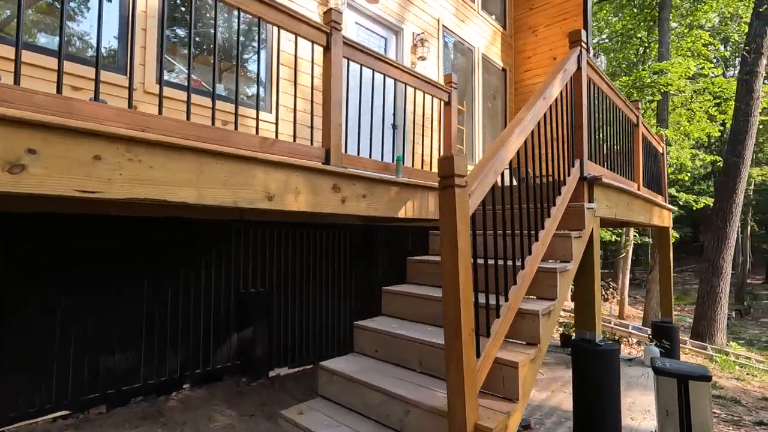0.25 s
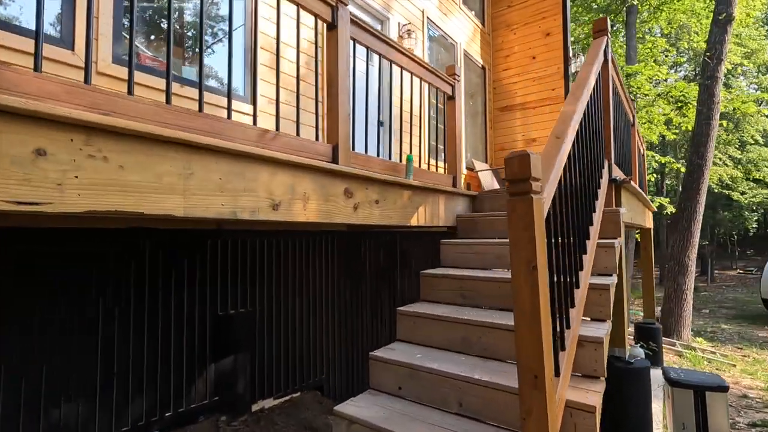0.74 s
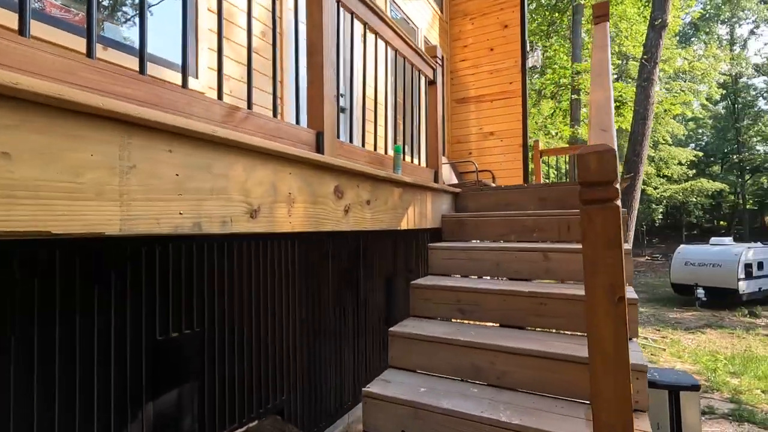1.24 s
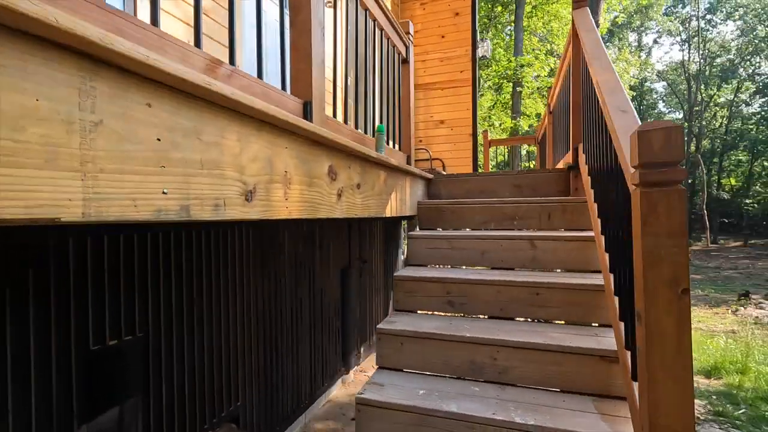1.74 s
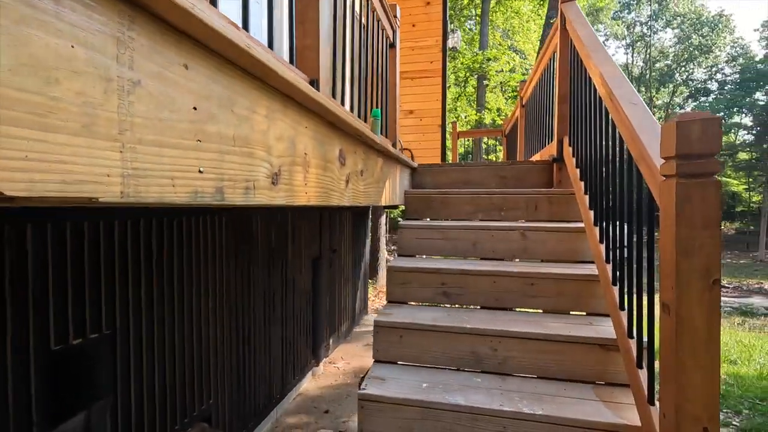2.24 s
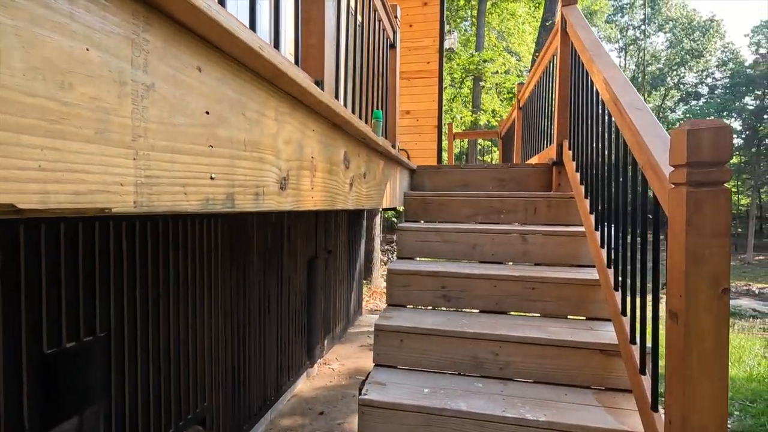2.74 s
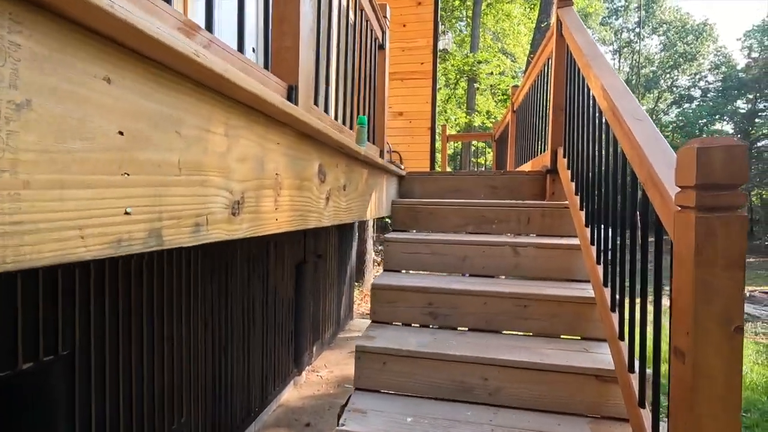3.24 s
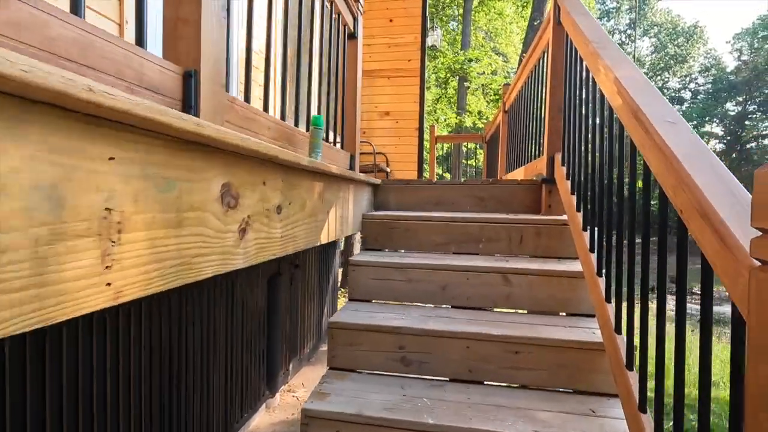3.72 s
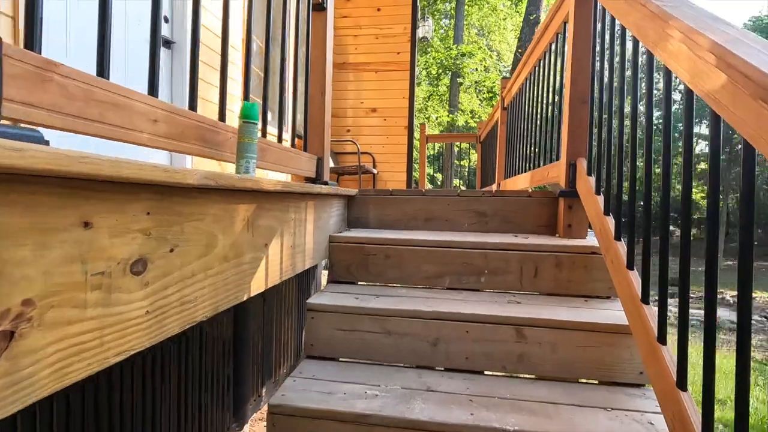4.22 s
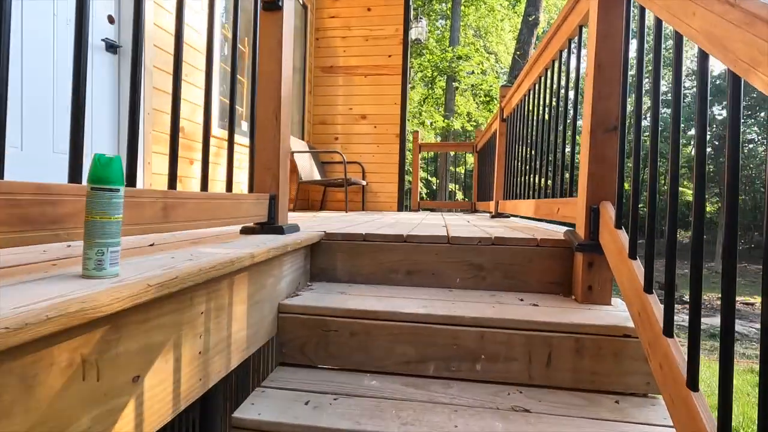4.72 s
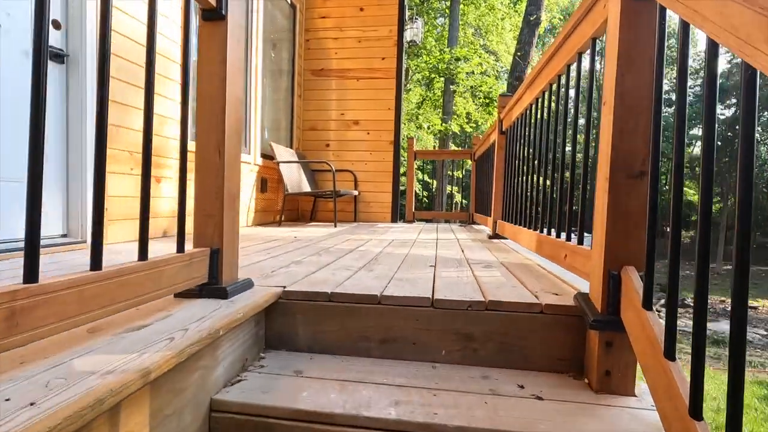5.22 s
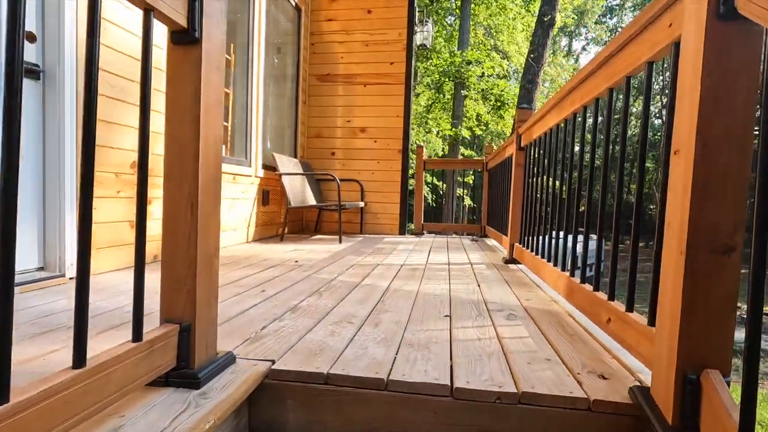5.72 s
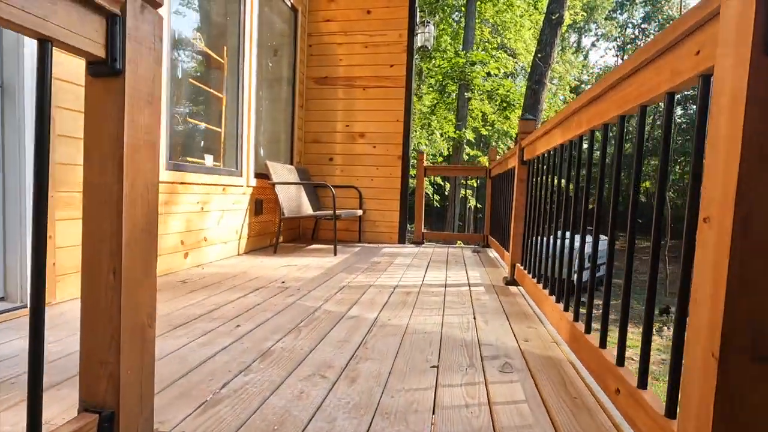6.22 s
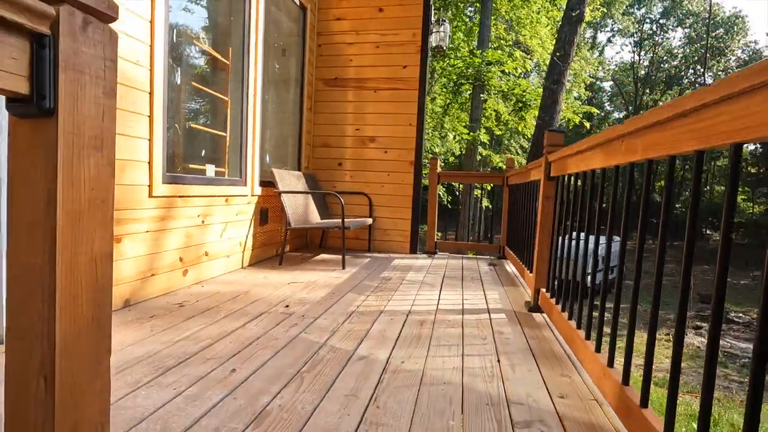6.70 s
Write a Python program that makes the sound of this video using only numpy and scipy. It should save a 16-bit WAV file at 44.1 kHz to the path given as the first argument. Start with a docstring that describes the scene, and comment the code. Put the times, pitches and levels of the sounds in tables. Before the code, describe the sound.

Outdoors beside a wooden house among trees, a walker carrying the microphone scuffs softly over packed earth. A nearby wren repeats a quick three-note gliding whistle during the first second or so, echoing off wall and trunks. Keys jingle briefly, a few soil steps follow, then shoes knock up hollow wooden stairs in spaced, low-ringing thuds. Clothes rustle, leaves hiss faintly, and handling rumble grows.

```python
"""Someone carrying a camera walks over packed earth, keys jingling, and climbs wooden deck stairs.
Each contact scuffs: noise for rub and grit; earth adds a dull push, treads add ringing board and stair-frame modes.
Shaken keys are noise through metal resonances. A wren repeats three gliding whistles, echoed by house and trees.
Faint far birds are narrow noise bands; shaped noise makes the dull wash around the steps, cloth rustle, dry ticks,
far leaves, drone and low rumble at the microphone."""
import sys
import numpy as np
from scipy import signal
from scipy.fft import rfft, irfft, next_fast_len
from scipy.io import wavfile
from scipy.ndimage import uniform_filter1d

SR = 44100
rng = np.random.default_rng(int(sys.argv[2]) if len(sys.argv) > 2 else 0)


def log_audio(samples):
    """Write samples as a 16-bit WAV file to the path given in sys.argv[1]."""
    # one column per channel
    frames = np.atleast_2d(samples).T
    # limit to full scale, then quantise
    limited = np.clip(frames, -1, 1)
    pcm = np.round(limited * 32767).astype(np.int16)
    wavfile.write(sys.argv[1], SR, pcm)


N = 306936
LEFT_RIGHT = np.array([[1], [-1]])  # sign of a level difference at each port


def amp(db):
    """Gain of a level in dB."""
    return 10 ** (np.asarray(db) / 20)


def unit(x):
    """Scaled to rms 1."""
    return x / np.sqrt(np.mean(x ** 2) + 1e-20)


def along(points, hz):
    """Value at each frequency, interpolated between (Hz, value) points on a log axis."""
    point_hz, value = np.transpose(points)
    return np.interp(np.log(hz + 1), np.log(point_hz + 1), value)


def curves(rows):
    """One value per sample for each column after the time."""
    s, *columns = np.transpose(rows)
    return [np.interp(np.arange(N) / SR, s, column) for column in columns]


def wobble(rate, size=N):
    """A random curve of straight lines between normal knots, rate knots a second."""
    knots = rng.standard_normal(int(size * rate / SR) + 2)
    return np.interp(np.arange(size) * rate / SR, np.arange(len(knots)), knots)


def swells(times, peaks_db, slopes, rest_db, held=0):
    """Level in dB that climbs to each peak, holds and falls away at fixed rates, down to a resting level."""
    after = np.arange(N) / SR - np.asarray(times)[:, None]
    climb_db = -slopes[0] * after
    fall_db = slopes[1] * (after - np.reshape(held, (-1, 1)))
    drop_db = np.maximum(np.maximum(climb_db, fall_db), 0)
    return np.maximum((np.asarray(peaks_db)[:, None] - drop_db).max(0), rest_db)


def filtered(x, response):
    """x shaped by a complex response of frequency."""
    size = next_fast_len(x.shape[-1] + 4096, True)
    spectrum = rfft(x, size) * response(np.fft.rfftfreq(size, 1 / SR))
    return irfft(spectrum, size)[..., :x.shape[-1]]


def noise(spectrum, crackle_db, size=N):
    """Coloured noise of rms 1; crackle spreads the grain sizes."""
    grain_db = crackle_db * np.minimum(rng.exponential(size=size), 6)
    grains = rng.standard_normal(size) * amp(grain_db)
    return unit(filtered(grains, lambda hz: amp(along(spectrum, hz))))


def rush(spectrum, alike, patchy_db):
    """Stereo noise of rms 1 with patches of random gain in time and frequency."""
    z = signal.stft(rng.standard_normal((2, N)), nperseg=512)[2]
    field = uniform_filter1d(rng.standard_normal(z.shape[1:]), 6, 0)
    field = uniform_filter1d(field, 14, 1)
    pair = signal.istft(z * amp(patchy_db * unit(field)), nperseg=512)[1][:, :N]

    def mid_side_gain(hz):
        angle = np.arccos(along(alike, hz)) / 2  # the likeness sets how much side joins the mid
        return amp(along(spectrum, hz)) * [np.cos(angle), np.sin(angle)]

    mid, side = filtered(pair, mid_side_gain)
    return unit(np.array([mid + side, mid - side]))


def add(out, s, x, pan_db=0):
    """Mixes x in at time s; pan_db is left above right."""
    seat = out[:, round(s * SR):][:, :x.shape[-1]]
    panned = np.atleast_2d(x) * amp(LEFT_RIGHT * pan_db / 2)
    seat += panned[:, :seat.shape[1]]


def ring(modes, t, attack, spread_db):
    """Damped modes at fresh strengths and slightly shifted pitches for one blow."""
    hz, db, t60 = np.transpose(modes)[:, :, None]
    level_luck, pitch_luck = rng.standard_normal((2, len(modes), 1))
    decay = amp(db + spread_db * level_luck - 60 * t / t60)
    tones = decay * np.sin(2 * np.pi * hz * (1 + 0.034 * pitch_luck) * t)
    return tones.sum(0) * (1 - np.exp(-t / attack))


# spread of an echo at the microphone: pitch_hz, side_below_mid_db
ECHO_WIDTH = [(60, -61), (250, -20), (600, -6), (4000, -8), (12000, 0)]


def echo(x, decay, size):
    """A stereo tail, mid energy 1, each frequency dying at its own speed; the ports share the bass."""
    hz, t, z = signal.stft(rng.standard_normal((2, size)), SR, nperseg=256)
    z = z * amp(-60 * t / along(decay, hz)[:, None])
    z[1] *= amp(along(ECHO_WIDTH, hz))[:, None]
    mid, side = signal.istft(z, SR, nperseg=256)[1]
    tail = np.array([mid + side, mid - side]) / np.linalg.norm(mid)
    return signal.fftconvolve(x[None], tail, axes=1)


# dull rub of a sole close to the ground: multiple_of_centre, level_db
RUB_COLOUR = [(.15, -11.5), (.5, -3.5), (1, 1), (1.6, -5.5), (2.5, -18), (5, -29.5), (12, -61)]
# fine grit under the sole: pitch_hz, level_db
GRIT_COLOUR = [(1200, -29), (2500, 0.5), (4000, -2), (6000, -7), (8500, -19), (12500, -30), (16000, -46)]


def scuff(db, centre_hz, grit_db, rise, slide, t60, t):
    """The sole skids, then stops: a dull rub plus finer grit that dies sooner."""
    swell = 1 - np.exp(-t / rise)
    fade = np.maximum(t - slide, 0) / t60
    rub_colour = [(centre_hz * multiple, level) for multiple, level in RUB_COLOUR]
    rub = noise(rub_colour, crackle_db=1.5, size=len(t)) * amp(db - 60 * fade)
    grit = noise(GRIT_COLOUR, crackle_db=0.0, size=len(t)) * amp(db + grit_db - 133 * fade)
    return (rub + grit) * swell


# swells as the walker moves through a stride: peak_s, wash_db (dull wash), rustle_db (clothes), jolt_db (camera)
WALK_STRIDES = [(.05, -59.5, -85, -45.5), (.37, -54.5, -61, -52), (.62, -62.5, -75, -49),
                (1.06, -56, -64.5, -37), (1.47, -65, -70, -44), (1.84, -60, -65.5, -38),
                (2.19, -57.5, -60, -49), (2.83, -80, -63, -55), (3.35, -66.5, -62.5, -47),
                (3.59, -60.5, -57.5, -38), (4.3, -58, -58.5, -33), (4.91, -62, -67, -26),
                (5.5, -62, -73, -31.5), (6.1, -59.5, -63.5, -26.5), (6.7, -60, -60, -29.5),
                (6.93, -61, -62, -37)]
# dull wash around the steps: pitch_hz, level_db (per Hz)
WASH_COLOUR = [(150, -9), (250, -8), (358, -7.5), (401, -5.5), (889, -9), (1100, -0.5), (2400, -9.5),
               (3120, -32), (5280, -120)]
# clothes close to the microphone: pitch_hz, level_db
CLOTH_COLOUR = [(2000, 1.5), (5000, 3.5), (8000, -4), (11000, -12.5), (12500, -6), (14000, -7), (16000, -5)]
WASH_DB_PER_S, RUSTLE_DB_PER_S = (80, 59), (46, 44)  # swell before the peak, fading after
WASH_REST_DB, RUSTLE_REST_DB = -82, -73.5


def strides():
    """A dull wash and the rustle of clothes: noise that swells to a peak and fades with each stride."""
    s, wash_db, rustle_db, _ = np.transpose(WALK_STRIDES)
    wash_level = swells(s, wash_db, WASH_DB_PER_S, WASH_REST_DB) + 3.5 * wobble(25)
    wash = amp(wash_level) * noise(WASH_COLOUR, crackle_db=0.0)
    cloth = np.array([noise(CLOTH_COLOUR, crackle_db=4.0), noise(CLOTH_COLOUR, crackle_db=-2.0)])
    rustle_level = swells(s, rustle_db, RUSTLE_DB_PER_S, RUSTLE_REST_DB) + 1.6 * wobble(38)
    rustle = amp(rustle_level) * cloth
    return wash * amp(LEFT_RIGHT * 1.2) + rustle * amp(LEFT_RIGHT * 3.5)


# slowly changing low sound at the microphone: time_s, rumble_db, drone_db, rumble_left_right_db
LOW_LEVELS = [(0, -51.5, -66.5, -3.5), (1.1, -50.5, -60.5, -3.5), (1.7, -47, -64.5, -3),
              (2.1, -49.5, -60.5, -3.5), (2.6, -58.5, -63, -4), (3.2, -44.5, -60.5, -5),
              (3.9, -45.5, -60.5, -7.5), (4.3, -42.5, -53, -4), (4.6, -44.5, -60.5, -6.5),
              (5.2, -38, -58, 2.5), (5.7, -37, -55.5, 2), (5.95, -41.5, -63.5, -4.5), (6.35, -41, -56, 4.5),
              (6.6, -40, -61.5, -2), (6.96, -33, -49, -1.1)]
# far leaves: pitch_hz, level_db (per Hz)
LEAF_COLOUR = [(240, -14), (400, -1.5), (466, -10.5), (544, -9), (862, -11.5), (1230, 1), (1800, -3),
               (3430, 1), (4260, -4.5), (5120, -3), (6540, -2), (8240, -8), (11400, -12), (12500, -12.5),
               (15700, -18.5)]
# likeness of the leaves at the two ports: pitch_hz, left_right_likeness (0 to 1)
LEAF_LIKENESS = [(60, 0.6), (180, 0.49), (550, 0.58), (1650, 0.27), (4970, 0.82), (15000, 0.38)]
# left-right lean of the leaves: pitch_hz, left_right_db
LEAF_LEAN = [(60, 5), (180, -13), (550, -14), (1650, 2), (4970, -1.5), (15000, 1.5)]
# low drone: pitch_hz, level_db (per Hz)
DRONE_COLOUR = [(24, -19), (40, -2), (64, -15.5), (129, -12.5), (248, -17), (395, -34), (427, -34.5),
                (600, -41.5), (780, -59), (1320, -120)]
# rumble of the moving camera: pitch_hz, level_db
RUMBLE_COLOUR = [(5, -13), (12, 7), (22, 0.5), (40, -12), (60, -16.5), (120, -91)]
LEAVES_DB = -62.5
JOLT_DB_PER_S, DRONE_OVER_JOLT_DB = (127, 114), -16.5  # swell and fading; drone jolt relative to rumble jolt


def woodland():
    """Far leaves hiss, a low drone hums and the moving camera rumbles; each stride jolts both low sounds."""
    rumble_db, drone_db, pan_db = curves(LOW_LEVELS)
    s, *_, peak_db = np.transpose(WALK_STRIDES)
    jolt_db = swells(s, peak_db, JOLT_DB_PER_S, rest_db=-120)
    leaves = amp(LEAVES_DB + 1.2 * wobble(0.8)) * rush(LEAF_COLOUR, LEAF_LIKENESS, patchy_db=1.95)
    leaves = filtered(leaves, lambda hz: amp(along(LEAF_LEAN, hz) / 2 * LEFT_RIGHT))
    drone_mid = noise(DRONE_COLOUR, crackle_db=0)
    drone_side = amp(-11.0) * LEFT_RIGHT * noise(DRONE_COLOUR, crackle_db=-1.5)
    rumble = noise(RUMBLE_COLOUR, crackle_db=-2.0) * amp(LEFT_RIGHT * pan_db / 2)
    # the louder of slow curve and jolt sets the level
    drone_level = np.maximum(drone_db, jolt_db + DRONE_OVER_JOLT_DB) + 3.9 * wobble(7.1)
    rumble_level = np.maximum(rumble_db, jolt_db) + 3.1 * wobble(9)
    return leaves + amp(drone_level) * (drone_mid + drone_side) + amp(rumble_level) * rumble


NOTE_EDGE_S = 0.0024  # soft ends of a note


def note(before, after, bend, start_hz, turn_hz, end_hz, start_db, turn_db, end_db):
    """A husky whistle glides to a rounded turn and away again; loudness bends with the pitch."""
    t = np.arange(-before, after, 1 / SR)
    way = np.where(t < 0, -t / before, t / after) ** bend  # 0 at the turn, 1 at either end
    glide_hz = turn_hz + (np.where(t < 0, start_hz, end_hz) - turn_hz) * way
    level_db = turn_db + (np.where(t < 0, start_db, end_db) - turn_db) * way
    level_db = level_db + 1.4 * wobble(150.0, size=len(t))
    pitch_hz = glide_hz * (rng.normal(1, 0.0076) + 0.016 * wobble(249.0, size=len(t)))
    edges = np.clip(np.minimum(t + before, after - t) / NOTE_EDGE_S, 0, 1)
    return edges * amp(level_db) * np.sin(2 * np.pi * np.cumsum(pitch_hz) / SR)


# the wren's phrases among the trees: start_s, level_db
WREN_SONG = [(-.137, -45.5), (.147, -44), (.447, -43), (0.746, -42.5), (1.057, -43.5)]
# notes of a phrase: start_s (into the phrase), before_turn_s, after_turn_s, bend (power of time),
# start_hz, turn_hz, end_hz, start_db, turn_db, end_db (above the phrase level)
WREN_PHRASE = [(-.009, 0.01985, .038, 2.4, 2206, 3138, 1980, -18, -0.4, -12.5),
               (.069, .03, .031, 1.85, 4900, 3604, 4440, -9, -5, -7.5),
               (.13, .021, .052, 1.2, 4430, 2840, 3527, -0.5, -2.5, -8.5)]
# echo off near trunks and the house: pitch_hz, t60_s
NEAR_ECHO = [(2000, 0.033), (5000, 0.18)]
# echo among trees: pitch_hz, t60_s
WOODS_ECHO = [(2000, 0.26), (5000, 1)]


def wren():
    """Three notes a phrase; the house wall repeats them, near and far echoes smear them."""
    lead = SR // 2  # room for a phrase that begins before time 0
    out = np.zeros((2, N + SR))
    for s, level_db in WREN_SONG:
        for start, *shape in WREN_PHRASE:
            call = amp(level_db) * note(*shape)
            at = s + start + lead / SR
            add(out, at, call, pan_db=1.0)
            add(out, at + 0.016, call * amp(-3), pan_db=6.0)  # house wall
            add(out, at + 0.002, amp(2.5) * echo(call, NEAR_ECHO, size=SR // 8))
            add(out, at + 0.023, amp(-1) * echo(call, WOODS_ECHO, size=SR * 2 // 5))
    return out[:, lead:lead + N]


# shoe on earth and stones, and one faint scrape as the keys shake (2.729):
# start_s, scuff_db, scuff_hz, grit_db (above the scuff), thud_db, rise_s, slide_s
EARTH_STEPS = [(.206, -50.5, 1200, 3.5, -66, .0017, .002), (.259, -53, 1100, 8, -56, 0.0022, 0.0044),
               (.3, -50.5, 980, 0, -67, .0039, 0.017), (.385, -49, 854, -8, -48, .0064, 0.037),
               (.674, -51, 1120, -21, -53.5, 0.00067, .002), (.883, -57, 994, -1, -56, .0019, 0.02),
               (.992, -51, 1014, -5, -41.5, 0.0028, .023), (1.131, -48.5, 1295, -18, -56, 0.00081, .0033),
               (1.706, -45.5, 900, -12, -48, 0.00052, 0.037),
               (1.737, -41.5, 870, -13, -37.5, 0.0038, 0.016), (1.803, -47, 720, -28, -55, .0008, .005),
               (1.892, -49, 1250, -10, -69, 0.00092, .002), (1.904, -51.5, 2000, 0.5, -48, .001, .002),
               (1.929, -41, 1200, -27, -50.5, .0006, .0008), (2.092, -43.5, 1220, -26, -68, 0.00054, .0009),
               (2.11, -58.5, 1700, -10, -65, .011, 0.045), (2.213, -48, 1110, -6, -53.5, 0.0044, 0.0053),
               (2.729, -62, 1500, 5, -76, .005, 0.034), (3.335, -62, 1010, -12, -80, .001, 0.017),
               (3.396, -51.5, 1380, -8, -80, 0.0019, 0.014), (3.492, -47, 1160, -15, -37.5, .0006, 0.028),
               (3.599, -58, 1610, -4, -57, .0054, 0.013)]
# weight landing on soil: pitch_hz, level_db
PUSH_COLOUR = [(60, -16), (150, -5), (350, -7), (700, -18), (3000, -70)]
# echo off wall and deck, for earth and stairs alike: pitch_hz, t60_s
YARD_ECHO = [(150, 0.47), (1000, 0.23), (4000, 0.16), (12000, 0.19)]
EARTH_SKID_T60_S, EARTH_PAN_DB = 0.051, 4


def earth():
    """Steps on soil do not ring: a scuff and one dull push."""
    out, t = np.zeros((2, N)), np.arange(SR // 7) / SR
    for s, db, scuff_hz, grit_db, thud_db, rise, slide in EARTH_STEPS:
        thud = amp(thud_db - 60 * t / 0.15) * (1 - np.exp(-t / 0.0057))
        push = noise(PUSH_COLOUR, crackle_db=4.5, size=len(t)) * thud
        skid = scuff(db, scuff_hz, grit_db, rise, slide, EARTH_SKID_T60_S, t)
        add(out, s, skid, EARTH_PAN_DB)
        add(out, s, push)
        add(out, s + 0.012, amp(-7.0) * echo(skid, YARD_ECHO, size=SR // 7))
    return out


# small dry ticks close to the camera: start_s, level_db, mid_db (above the treble)
DRY_TICKS = [(1.5658, -60, -1), (1.6487, -50, 12), (2.825, -51, -9), (3.0056, -51.5, -3), (4.4807, -51, 8),
             (4.5571, -50, 20), (4.6178, -48, 6), (5.6915, -53, 11)]


def ticks():
    """Short bright clicks: bursts of noise that die in about 12 ms."""
    out, t = np.zeros((2, N)), np.arange(SR // 50) / SR
    for s, db, mid_db in DRY_TICKS:
        colour = [(1500, mid_db - 26), (3500, mid_db), (7000, -2), (12000, 0), (16000, -8.0)]
        click = amp(db - 60 * t / 0.012) * noise(colour, crackle_db=0, size=len(t))
        add(out, s, click, pan_db=4)
    return out


# shakes of the bunch: full_s (held from here), held_s, level_db
KEY_SHAKES = [(2.37, 0.095, -49.5), (2.62, 0.053, -52.5), (2.74, 0.017, -55.5), (2.94, 0.045, -53)]
# single clinks: start_s, level_db (peak), low_db (lift of the modes below 3500 Hz)
KEY_CLINKS = [(2.376, -50, -17), (2.3887, -37, -12.5), (2.4073, -32.5, -25), (2.6354, -37, 12),
              (2.7496, -52, -10.5), (2.9442, -46, -11), (2.9662, -32, -11), (2.9729, -36, -18)]
# resonances of the keys: pitch_hz, width_hz, level_db
KEY_MODES = [(1950, 58, -5.5), (2340, 48, -8), (2780, 77, -26), (3040, 72, -1.5), (3400, 67, -8),
             (3400, 79, -20), (3990, 51, -2.5), (4970, 66, 6.5), (5156, 57, 5.5), (5400, 85, -8),
             (6150, 180, -13), (8160, 120, -11), (12070, 240, -13)]
# broad rasp of sliding keys: pitch_hz, level_db
RASP_COLOUR = [(800, -40), (1800, -3.5), (3200, 4.5), (5500, -11), (7000, -4), (10000, -8.5), (12500, -10),
               (16000, -35)]
SHAKE_DB_PER_S, KEYS_REST_DB = (262, 218), -63  # swell and fading; hanging still
KEYS_SPAN_S = (2.3, 3.04)


def keys():
    """Keys slide and clink; each metal resonance is excited in its own fits, over a broad rasp."""
    out = np.zeros((2, N))
    start, size = round(KEYS_SPAN_S[0] * SR), round((KEYS_SPAN_S[1] - KEYS_SPAN_S[0]) * SR)
    s, held, db = np.transpose(KEY_SHAKES)
    shake_db = swells(s, db, SHAKE_DB_PER_S, KEYS_REST_DB, held)
    stroke = amp(shake_db)[start:start + size] * signal.windows.tukey(size, .1)

    def mode(f, centre, width):
        return 1j * f * width / (centre * centre - f * f + 1j * f * width)

    grains = rng.standard_normal(size) * amp(1.7 * rng.exponential(size=size))
    rub = np.zeros(size)
    for centre, width, level in KEY_MODES:
        fits = amp(level + 5.5 * wobble(35.4, size=size))
        rub += fits * unit(filtered(grains, lambda f: mode(f, centre, width))) * np.sqrt(width / 100)
    rasp = amp(-9 + 6.2 * wobble(39.1, size=size)) * noise(RASP_COLOUR, crackle_db=4.5, size=size)
    add(out, start / SR, stroke * (unit(rub) + rasp))

    t = np.arange(SR // 20) / SR
    for s, db, low_db in KEY_CLINKS:
        tick = rng.standard_normal(len(t)) * amp(-60 * t / 0.0011)

        def metal(f):
            total = amp(-42)  # a trace of the bare tick
            for centre, width, level in KEY_MODES:
                strength_db = level + rng.normal(0, 3.1) + low_db * (centre < 3500)
                total = total + amp(strength_db) * mode(f, centre, width)
            return total

        clink = filtered(tick, metal)
        add(out, s, amp(db) * clink / np.abs(clink).max())
    return out * amp(LEFT_RIGHT * 1.6)


# husky notes of distant birds: start_s, length_s, pitch_hz, level_db
FAR_NOTES = [(3.513, 0.18, 2560, -64.5), (3.842, 0.21, 2890, -71), (5.081, 0.28, 2560, -72),
             (6.668, 0.086, 3980, -60.5), (6.782, .17, 4980, -70)]


def far_birds():
    """Distant whistles arrive as narrow, wavering bands of noise."""
    out = np.zeros((2, N))
    for s, length, hz, db in FAR_NOTES:
        size = round(length * SR)
        band = [(hz - 300, -60), (hz - 45, -6), (hz, 0), (hz + 45, -6), (hz + 300, -60)]
        whistle = np.sqrt(np.hanning(size)) * noise(band, crackle_db=7.5, size=size)
        add(out, s, amp(db) * whistle)
    return out


# shoe on a tread: start_s, scuff_db, scuff_hz, grit_db (above the scuff), knock_db, knock_hz (centre),
# sway_db, rise_s, slide_s
TREAD_STEPS = [(4.08, -71, 700, -6, -52, 80, -37.5, .003, .002),
               (4.202, -46, 1370, -2, -26, 289, -61, .0009, .001),
               (4.223, -39.5, 2090, 5, -37, 288, -53, 0.0025, .002),
               (4.241, -30, 1530, -12, -32, 248, -47, 0.0007, .0017),
               (4.254, -26.5, 1110, -10, -17.5, 276, -54, 0.00047, 0.0076),
               (4.352, -51, 1120, -6, -34, 293, -54, .0046, 0.014),
               (4.816, -34.5, 1490, -6, -32, 196, -28, 0.0015, 0.0018),
               (4.826, -31, 1260, -9.5, -17.5, 284, -57, .0007, .0016),
               (4.874, -32, 820, -16, -16.5, 223, -32, 0.0027, 0.0064),
               (4.888, -29, 1310, -34, -22, 240, -32.5, 0.00069, 0.0023),
               (4.901, -38, 1110, -4.5, -19, 258, -34, .001, .0018),
               (5.054, -56, 1160, -20, -39, 145, -39, .0025, 0.005),
               (5.408, -36, 1230, -6, -25.5, 350, -28.5, 0.0022, .012),
               (5.483, -32.5, 790, -9.5, -19, 377, -48, 0.0008, 0.0024),
               (5.505, -42, 673, -30, -35, 620, -60, 0.0054, 0.02),
               (5.991, -52.5, 1090, -25, -48, 250, -56, 0.0047, 0.01),
               (6.006, -26.5, 1390, -9, -11.5, 209, -31, 0.00024, 0.0064),
               (6.02, -27.5, 1100, -2.5, -13, 416, -22, 0.00057, 0.0086),
               (6.069, -37.5, 1280, 1, -43, 240, -33, 0.002, 0.0016),
               (6.337, -59.5, 970, -24, -64, 220, -45, .0005, 0.018),
               (6.644, -33, 1490, -2.5, -35.5, 250, -46, 0.003, .013),
               (6.755, -50, 880, -16, -50, 256, -49, 0.0029, .045)]
# modes of a board: pitch_hz, level_db, t60_s (before the shoe's weight damps it)
TREAD_MODES = [(70.6, -2, 0.19), (104.6, -5.5, 0.5), (180.3, 0, 0.25), (248, -2, 0.24), (285.4, 2.5, 0.12),
               (342.8, 1, 0.17), (412.4, 1, 0.1), (531, -10.5, 0.21), (692, -9.5, 0.12),
               (1003, -10.5, 0.094), (1090, -34, 0.11), (1523, -1.5, 0.053), (1740, -17.5, 0.062),
               (2095, -28, 0.043)]
# modes of the stair frame: pitch_hz, level_db, t60_s
FLIGHT_MODES = [(14.7, 4.5, 0.28), (21.6, -4.5, 2.7), (26.95, -4.5, 1.73), (42.3, 1, 0.54), (72, -24, 0.31),
                (101.9, -11.5, 0.45)]
TREAD_SKID_T60_S, TREAD_PAN_DB = 0.057, 4.5
DAMPED_SHARE = 0.54  # ring time left under the weight


def stairs():
    """Every contact scuffs, knocks the board and sways the flight."""
    out, t, long = np.zeros((2, N)), np.arange(SR // 5) / SR, np.arange(SR // 2) / SR
    for s, db, scuff_hz, grit_db, knock_db, knock_hz, sway_db, rise, slide in TREAD_STEPS:
        skid = scuff(db, scuff_hz, grit_db, rise, slide, TREAD_SKID_T60_S, t)
        # where the shoe lands decides which modes speak loudest; its weight damps them
        modes = []
        for hz, level, ring_t60 in TREAD_MODES:
            octaves_off = min(abs(np.log2(hz / knock_hz)), .7)
            modes.append((hz, level - 14 * octaves_off, ring_t60 * DAMPED_SHARE))
        knock = amp(knock_db) * ring(modes, t, attack=0.0033, spread_db=3.0)
        knock = knock * np.cos(np.pi / 2 * t / t[-1])  # fades to silence
        sway = amp(sway_db) * ring(FLIGHT_MODES, long, attack=0.018, spread_db=1.5) * np.cos(np.pi * long)
        add(out, s, skid, TREAD_PAN_DB)
        add(out, s, knock, pan_db=.6)
        add(out, s, sway)
        add(out, s + .008, amp(-9.5) * echo(skid + knock, YARD_ECHO, size=SR // 5))
    return out


def scene():
    """All sources at the microphone."""
    return strides() + woodland() + wren() + earth() + ticks() + keys() + far_birds() + stairs()


# treble colour of the two microphone ports: pitch_hz, left_db, right_db
PORT_COLOUR = [(5560, -0.5, -1), (10500, -2, -3.5), (11850, -6, -1.5), (12600, 3.5, -19), (13300, -7.5, -8),
               (16000, -7, -10)]
TOP_HZ = 15780  # band limit


def record(dry):
    """Each port has its own treble colour; the camera keeps nothing above its band limit."""
    hz, *sides = np.transpose(PORT_COLOUR)

    def port_gain(f):
        colour_db = [along(np.transpose([hz, db]), f) for db in sides]
        return amp(colour_db) * (f < TOP_HZ)

    return filtered(dry, port_gain)


dry = scene()
out = record(dry)
log_audio(out)
```